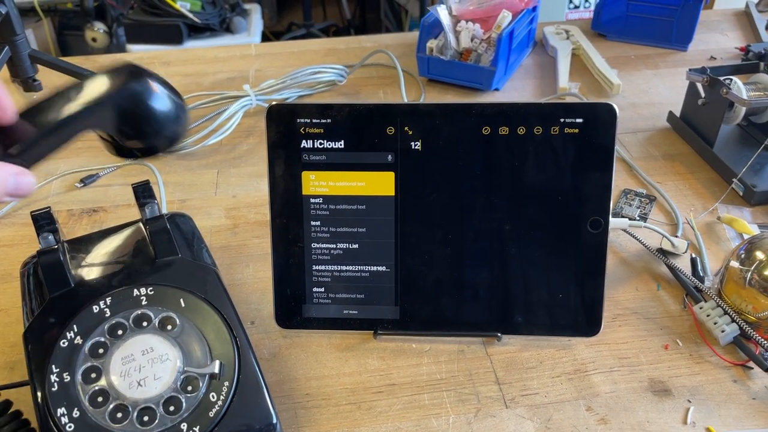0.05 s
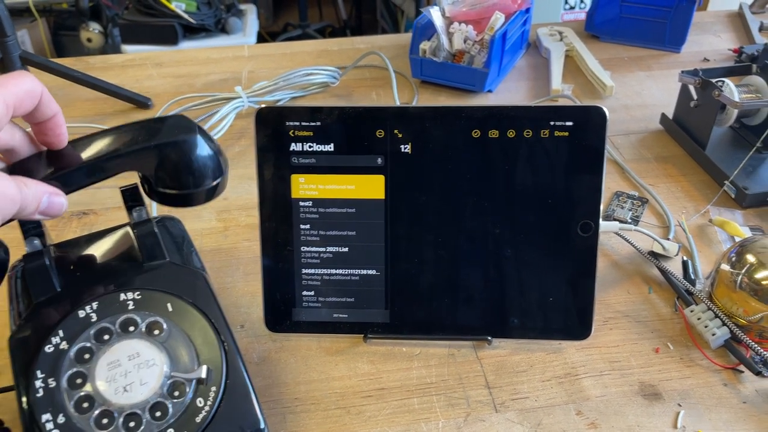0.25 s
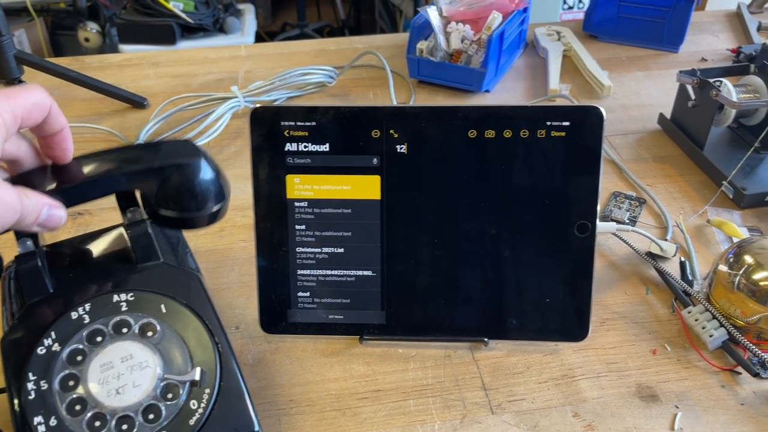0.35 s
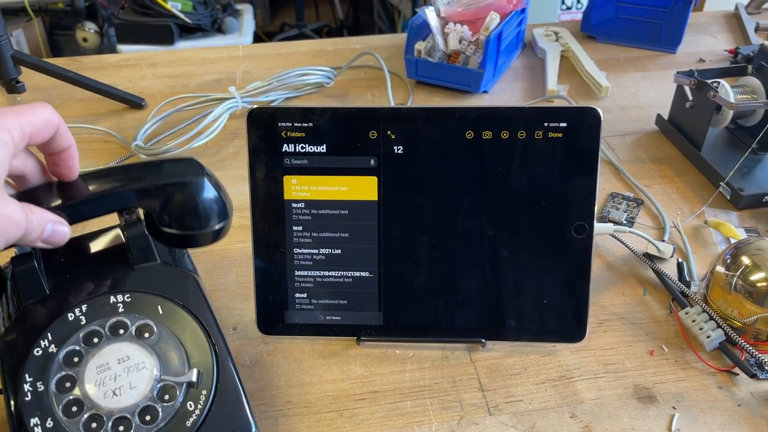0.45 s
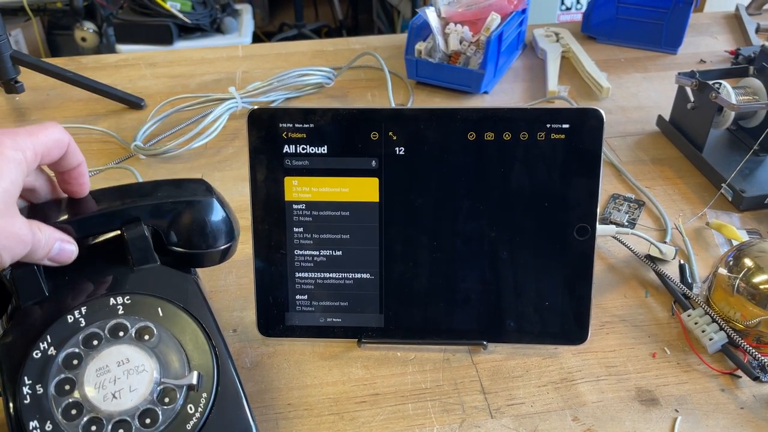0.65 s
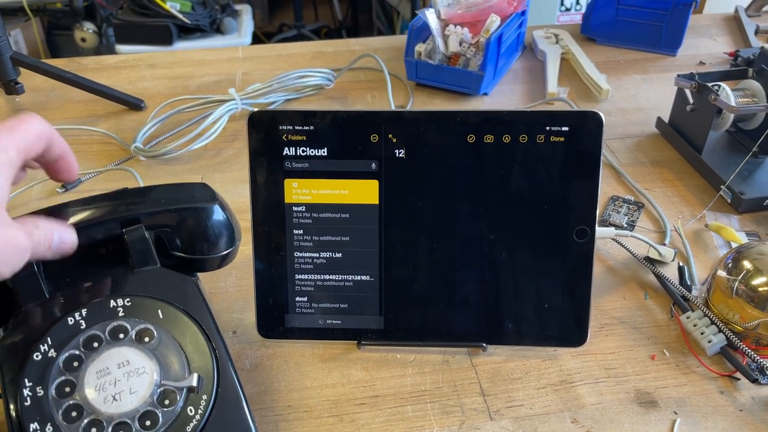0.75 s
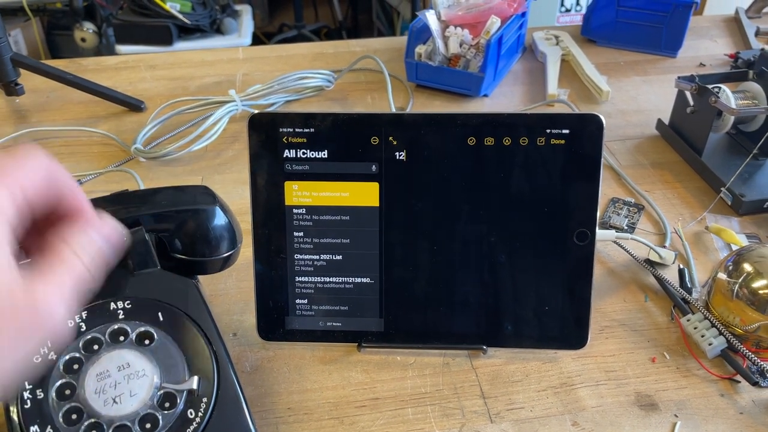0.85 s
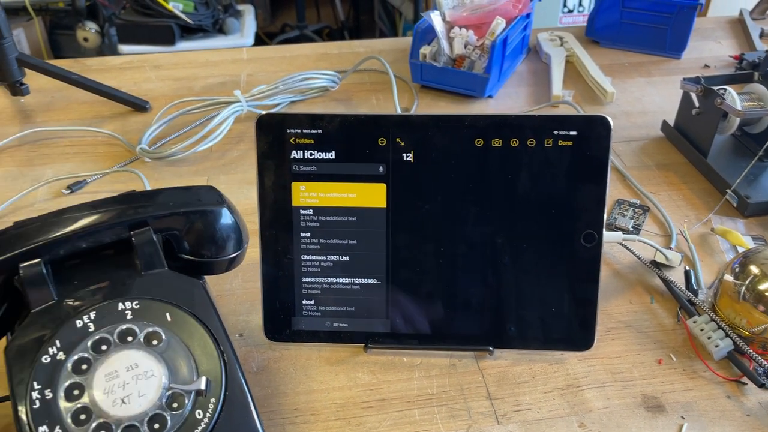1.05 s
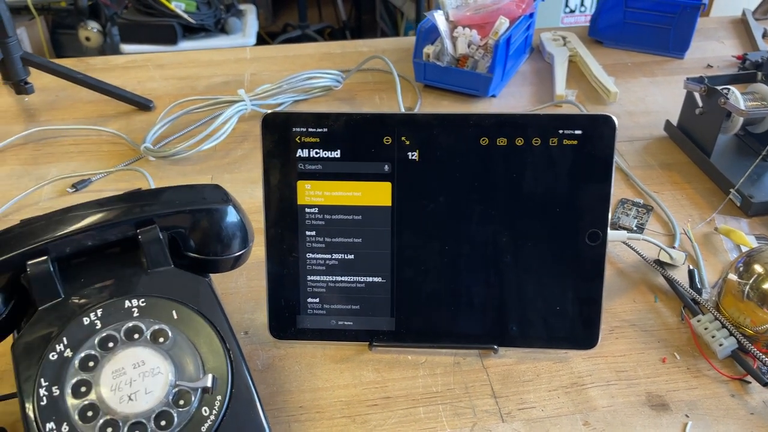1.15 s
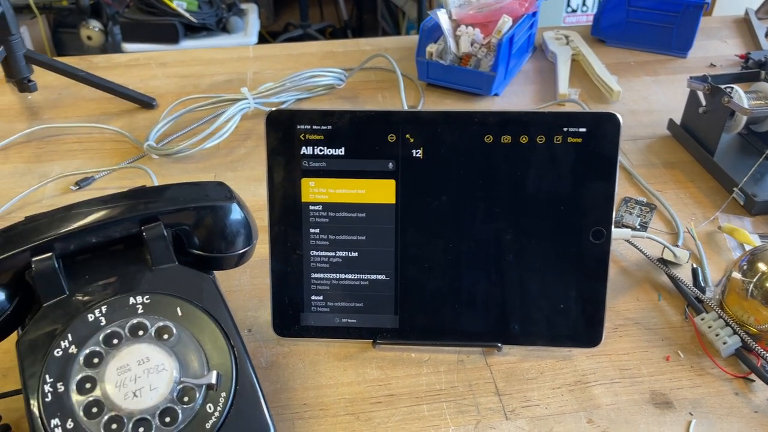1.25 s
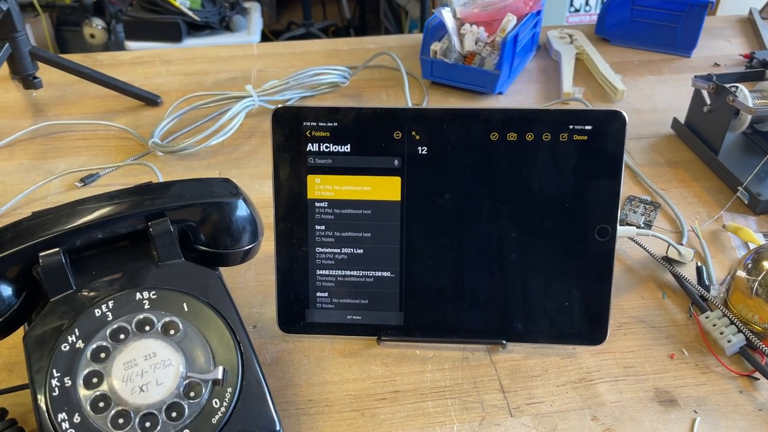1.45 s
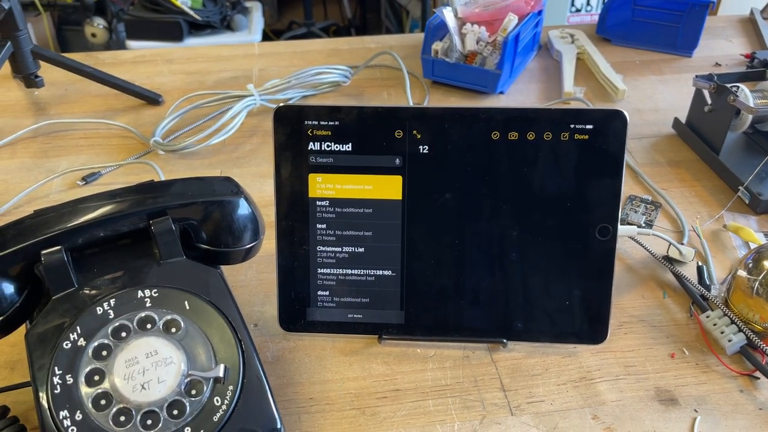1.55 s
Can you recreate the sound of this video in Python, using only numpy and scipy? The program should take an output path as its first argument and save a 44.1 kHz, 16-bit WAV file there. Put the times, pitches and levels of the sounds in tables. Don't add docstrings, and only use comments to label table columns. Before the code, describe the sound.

A heavy plastic telephone handset lands on its cradle, close and slightly left. A sharp hollow clack comes at 0.25 seconds, another at 0.44, a lighter tap near 0.58, then a bright drop at 0.75 with rattling bounces until about 0.9. Skin and cord slide faintly; tiny ticks and creaks settle by 1.2. The bench hums low, the room answers briefly, and soft ventilation rumbles throughout.

```python
import sys
import numpy as np
from scipy import signal
from scipy.fft import rfft, irfft, next_fast_len
from scipy.io import wavfile
from scipy.ndimage import uniform_filter1d

SR = 44100
rng = np.random.default_rng(int(sys.argv[2]) if len(sys.argv) > 2 else 0)


def unload_audio(sound):
    columns = np.transpose(np.atleast_2d(sound))
    steps = np.round(np.clip(columns, -1, 1) * 32767)
    wavfile.write(sys.argv[1], SR, steps.astype(np.int16))


def makeup_ratio(level_db):
    decades = np.asarray(level_db, float) / 20
    return 10 ** decades


N = 70560
AIR_TOP_HZ = 12400

# start_s, chatter_db, base_db, shell_db, cradle_db
KNOCKS = [(0.2439, -18.5, -21, -19, -21), (0.2539, -20.5, -29, -32, -44.5), (0.2604, -61, -35, -48, -44),
          (0.4366, -20, -18, -18, -22), (0.4406, -24.5, -41, -26.5, -40.5),
          (0.4474, -43.5, -35, -40, -37.5), (0.5841, -30, -29, -29, -39.5), (0.618, -51, -42.5, -62, -69),
          (0.6341, -39, -52.5, -45.5, -56), (0.697, -38.5, -40, -41, -35),
          (0.7498, -20.5, -22.5, -24, -33.5), (0.7548, -29.5, -30, -36.5, -39.5),
          (0.8031, -25, -25.5, -23, -33), (0.851, -30, -29.5, -28.5, -31), (0.8709, -41, -37, -46.5, -41.5),
          (0.8982, -49, -53, -48, -47.5), (0.951, -63, -43.5, -45, -40.5), (1.0014, -54, -49, -47, -41.5)]
LANDINGS = [
    .42,
    .57,
]
# delay_s, level_db
FIRST_TOUCHES = [
    (.0005, -23),
    (.0022, 1),
    (.0044, 5),
]
# delay_s, level_db
SECOND_TOUCHES = [
    (.0005, -10),
    (.0019, 0.5),
    (.0042, 4.5),
]
# delay_s, level_db
DROP_TOUCHES = [
    (.0005, -7.5),
    (.0022, 3),
    (.0044, 7.5),
]
# pitch_hz, t60_s, first_fork_db, second_fork_db, drop_db
BASE = [(235.5, .08, -18.5, -4, -5), (350, 0.022, -9.5, -27.5, -18.5), (381, .05, -7.5, -13, -3.5),
        (437, 0.071, 0.5, -6, -6.5)]
# pitch_hz, t60_s, first_fork_db, second_fork_db, drop_db
SHELL = [(780, 0.0067, -9, -12.5, -3), (885, 0.027, -4.5, -6.5, -3.5), (974, .03, 0.5, -3, -5),
         (1064.5, 0.023, -11.5, 7, 5), (1293, 0.0304, -14.5, -19.5, -11)]
# pitch_hz, t60_s, first_fork_db, second_fork_db, drop_db
CRADLE = [(499.7, 0.063, -13.5, -10, -8.5), (583, .03, -5.5, -12.5, -9.5), (597.7, .034, -5, -3.5, -7),
          (646.4, 0.062, 1.5, 3, -1.5)]
# pitch_hz, t60_s, first_fork_db, second_fork_db, drop_db
PARTS = [(1482, 0.029, 0.5, 0, 10), (1700, 0.059, 0, 8.5, 12), (1817, .025, 3.5, 11, -7),
         (2010, .03, 3, -1, -17), (2287, .03, 5, 2.5, 2.5), (2600, .03, 3.5, -6.5, -4.5),
         (2857, .027, -4.5, -3, 8), (3190, .021, -10, -1, 2), (3400, .03, -10.5, -18.5, 1.5),
         (4630, .02, -3.5, -12, -10), (5600, .026, -1, -0.5, -1), (5870, .026, -2, -1.5, -7),
         (7300, .023, -13.5, -18.5, -22.5), (8880, .023, 4.5, -6.5, -10.5)]
# pitch_hz, level_db (per Hz)
CRACK = [(760, -8), (1300, -3), (2740, -7.5), (3760, -15), (4560, -11.5), (5070, -19.5), (8720, -16.5),
         (11400, -20), (16500, -75)]
# start_s, level_db, centre_hz
TICKS = [(0.16, -67.5, 4500), (0.158, -50, 1930), (0.2366, -51.5, 1910), (0.429, -29, 1670),
         (.5891, -35.5, 4780), (0.618, -42.5, 4840), (0.6374, -47.5, 4600), (0.6938, -44.5, 4700),
         (0.898, -55, 4000), (.9186, -63, 3710), (.952, -55, 2750), (0.955, -79, 4080), (1.002, -72, 2933)]
# start_s, length_s, level_db
EDGES = [
    (.2438, .003, -10.5),
    (0.433, .009, -2),
    (0.75, 0.0043, -1.5),
]
# time_s, level_db
SETTLING = [
    (.84, -80),
    (.88, -50),
    (.94, -55),
    (1.03, -53),
    (1.1, -54),
    (1.2, -70),
    (1.25, -85),
]
# time_s, level_db
HANDLING = [(0, -68), (.05, -70), (.08, -85), (.42, -80), (.5, -64), (.6, -57), (.74, -57), (.86, -56),
            (.93, -67), (1.05, -69), (1.13, -75), (1.2, -95)]
# pitch_hz, level_db (per Hz)
SLIDE = [(200, -13.5), (500, -4.5), (1200, 7), (2500, 1), (5000, -11.5), (9000, -14), (13000, -22)]
# pitch_hz, difference_db
LEFT_LOUDER = [(60, 3.5), (130, -0.5), (290, 0.5), (640, 3), (1410, -1), (3100, 3), (6820, 6.5),
               (15000, 0.5)]
# pitch_hz, lead_radians
LEFT_LEADS = [(200, .15), (600, .45), (1290, 1.4), (3010, 6.6), (7580, 7.2), (11600, .3), (12900, -.3),
              (14900, -6.2)]
# pitch_hz, t60_s
ROOM_T60 = [(200, 0.53), (700, 0.33), (2500, 0.38), (6000, 0.35), (12000, 0.33)]
MOVES = [
    .42,
    .57,
    .74,
    .845,
]
# pitch_hz, level_db (per Hz)
RUMBLE = [(30, -4), (62, 0), (125, -5), (250, -12), (500, -23), (1000, -37), (2500, -57), (12000, -66)]
# pitch_hz, likeness (0 to 1)
LIKENESS = [(60, 1), (240, 0.69), (950, 0.13), (3770, 0.81), (15000, 1)]


def rms_one(x):
    return x / np.sqrt(np.mean(x ** 2) + 1e-20)


def at_hz(points, hz):
    p = np.array(points)
    return np.interp(np.log(hz + 1), np.log(p[:, 0] + 1), p[:, 1])


def at_time(points):
    s, db = np.transpose(points)
    return makeup_ratio(np.interp(np.arange(N) / SR, s, db))


def shape(x, response):
    size = next_fast_len(2 * N)
    return irfft(rfft(x, size) * response(np.arange(size // 2 + 1) * SR / size), size)[..., :N]


def butter(x, order, hz, kind="low"):
    return signal.sosfilt(signal.butter(order, hz, kind, fs=SR, output="sos"), x)


def ring(clicks, hz, t60):
    r = makeup_ratio(-60 / (t60 * SR))
    w = 2 * np.pi * hz / SR
    return signal.lfilter([0, np.sin(w)], [1, -2 * r * np.cos(w), r * r], clicks + 1e-18)


def impulses(s, gain):
    lead_s = 0.0005
    out = np.zeros(N)
    np.add.at(out, ((np.ravel(s) - lead_s) * SR).astype(int), np.ravel(gain))
    return out


def body(modes, column, spread_db, longest=1):
    contact_hz, push_db = 1810, -8
    rows = np.array(KNOCKS)
    landing = np.searchsorted(LANDINGS, rows[:, 0])
    touches = np.array([FIRST_TOUCHES, SECOND_TOUCHES, DROP_TOUCHES])[landing]
    touch_s = rows[:, :1] + touches[:, :, 0]
    touch_db = rows[:, column:column + 1] + touches[:, :, 1]
    out = 10 * impulses(touch_s, makeup_ratio(touch_db + push_db))
    for hz, t60, *db in modes:
        luck_db = spread_db * rng.standard_normal(len(rows))
        mode_db = np.array(db)[landing] + luck_db
        strikes = impulses(touch_s, makeup_ratio(touch_db + mode_db[:, None]))
        out = out + ring(strikes, hz, min(t60, longest))
    return butter(out, 2, contact_hz)


def chatter_envelope(follows):
    rise_s, t60_s, bright_at_db = 0.0013, 0.032, -22
    s, db = np.array(KNOCKS)[:, :2].T
    t = np.arange(SR // 4) / SR
    db = db + follows * (db - bright_at_db)
    rattle = (1 - np.exp(-t / rise_s)) * makeup_ratio(-60 * t / t60_s)
    return signal.fftconvolve(impulses(s + 0.0005, makeup_ratio(db)), rattle)[:N]


def chatter():
    clicks_per_s, part_cycles = 4300, 45
    dull_hz = 4500
    full, top = chatter_envelope(follows=0), chatter_envelope(follows=1)
    sizes = makeup_ratio(2.8 * np.minimum(rng.exponential(1, N), 4)) * rng.choice([-1, 1], N)
    clicks = rms_one(sizes * (rng.random(N) < clicks_per_s / SR))
    dealt = rng.integers(0, 3, N)
    landing = np.searchsorted(LANDINGS, np.arange(N) / SR)
    parts = np.zeros(N)
    for k, (hz, t60, *db) in enumerate(PARTS):
        loudness = makeup_ratio(db)[landing] * (top if hz > dull_hz else full)
        parts += ring(loudness * clicks * (dealt == k % 3), hz, min(t60, part_cycles / hz))
    hiss = rms_one(shape(rng.standard_normal(N), lambda hz: makeup_ratio(at_hz(CRACK, hz))))
    low = shape(hiss, lambda hz: 1 / (1 + (hz / dull_hz) ** 4))
    crack = low * full + (hiss - low) * top
    return makeup_ratio(-22) * parts, makeup_ratio(0.5) * crack


def ticks():
    octaves, top_hz, t60_s, rise_s = 0.26, 6780, 0.035, 0.00074
    out, t = np.zeros(N), np.arange(SR // 20) / SR
    for s, db, hz in TICKS:
        fade = makeup_ratio(db - 0.5 - 60 * t / t60_s) * np.clip(t / rise_s, 0, 1)
        burst = rng.standard_normal(len(t)) * fade
        tick = 2 * butter(burst, 3, hz * 2 ** (octaves * np.array([-1, 1])), "band")
        if hz > 4400:
            tick = tick + makeup_ratio(-11) * butter(burst, 2, [top_hz, AIR_TOP_HZ], "band")
        out[int(s * SR):int(s * SR) + len(t)] += tick
    return out


def thump():
    late_s = 0.0051
    rows = np.array(KNOCKS)
    push = impulses(rows[:, 0] + late_s, makeup_ratio(rows[:, 2]))
    hum = ring(push, hz=97.57, t60=0.29) + makeup_ratio(-5.5) * ring(push, hz=170, t60=0.98)
    return butter(hum, 2, [70, 220], "band")


def settling():
    creeps_per_s = 48
    out = np.zeros(N)
    for hz, t60, *_, level_db in BASE[1:] + CRADLE + SHELL[1:]:
        creeps = makeup_ratio(rng.exponential(1, N)) * (rng.random(N) < creeps_per_s / SR)
        out += makeup_ratio(level_db - 3.3 * (hz > 750)) * ring(creeps - creeps.mean(), hz, t60)
    return at_time(SETTLING) * rms_one(out)


def handling():
    slips_per_s = 1300
    sizes = makeup_ratio(2 * np.minimum(rng.exponential(1, (2, N)), 4)) * rng.choice([-1, 1], (2, N))
    slips = sizes * (rng.random((2, N)) < slips_per_s / SR)
    mix = rms_one(slips) + 1.3 * rng.standard_normal((2, N))
    coloured = shape(mix, lambda hz: makeup_ratio(at_hz(SLIDE, hz)))
    return at_time(HANDLING) * rms_one(spread(*coloured))


def edges_only(x):
    edge_hz = 12600
    t = np.arange(N) / SR
    dull = shape(x, lambda hz: 1 / (1 + (hz / edge_hz) ** 60))
    gate = sum(makeup_ratio(db) * (t > s) * (t < s + length) for s, length, db in EDGES)
    return dull + (x - dull) * uniform_filter1d(gate, size=60)


def place_left(phone):
    sign = np.array([[.5], [-.5]])

    def path(hz):
        louder = makeup_ratio(sign * at_hz(LEFT_LOUDER, hz))
        return louder * np.exp(1j * sign * at_hz(LEFT_LEADS, hz))
    return shape(phone, path)


def spread(mid, side):
    alike_below_hz = 2700
    side = shape(side, lambda hz: makeup_ratio(1) * hz / np.hypot(hz, alike_below_hz))
    return np.array([mid + side, mid - side])


def room(x):
    walls_db, near_db, near_t60_s, rise_s = -25, -7.5, 0.099, 0.0009
    t, tail = np.arange(SR * 3 // 4) / SR, 0
    edges = 60 * 2 ** np.arange(0, 8.6, .5)
    white = rng.standard_normal((2, 2, len(t)))
    for k, (low, high) in enumerate(zip(edges, edges[1:])):
        band = butter(white[k % 2], 2, [low, high], "band")
        walls = makeup_ratio(walls_db - 60 * t / at_hz(ROOM_T60, low))
        clutter = makeup_ratio(near_db - 60 * t / near_t60_s)
        tail = tail + band * (walls + clutter)
    tail = tail * np.clip(t / rise_s, 0, 1) / 20
    return signal.fftconvolve(x[None], tail, axes=1)[:, :N]


def rumble():
    mid, side = rng.standard_normal((2, N))
    colour = lambda hz: makeup_ratio(at_hz(RUMBLE, hz))
    alike = lambda hz: np.clip(at_hz(LIKENESS, hz), 0, 1)
    mid = shape(mid, lambda hz: colour(hz) * np.sqrt(1 + alike(hz)))
    side = shape(side, lambda hz: colour(hz) * np.sqrt(1 - alike(hz)))
    return makeup_ratio(-42.5) * rms_one(np.array([mid + side, mid - side]))


def scene():
    base = makeup_ratio(-8) * body(BASE, column=2, spread_db=0.5)
    shell = makeup_ratio(-8.5) * body(SHELL, column=3, spread_db=1, longest=0.038)
    cradle = makeup_ratio(-5) * body(CRADLE, column=4, spread_db=4.5)
    knocks = base + shell + cradle + settling() + ticks()
    parts, crack = chatter()
    direct = knocks + parts + crack
    spreading = knocks + makeup_ratio(-3.5) * parts + makeup_ratio(1) * crack
    direct, spreading = butter([direct, spreading], 2, 130, "high")
    near = place_left(direct + makeup_ratio(-18) * thump())
    place = np.searchsorted(MOVES, np.arange(N) / SR)
    echoes = sum(room(spreading * (place == k)) for k in range(len(MOVES) + 1))
    diffuse = spread(*echoes) + handling() + rumble()
    return edges_only(near) + butter(diffuse, 24, AIR_TOP_HZ)


def top_cut(x):
    return signal.sosfilt(signal.butter(12, 16670, fs=SR, output="sos"), x)


def record(dry):
    def port(hz):
        notch_db = -24 * np.exp(-((hz - 10200) / 330) ** 2)
        dip_db = -16 * np.exp(-((hz - 13700) / 500) ** 2)
        shelf_db = -1.5 / (1 + np.exp((12610 - hz) / 200))
        low_cut_db = -24 / (1 + (hz / 40) ** 4)
        return makeup_ratio(notch_db + dip_db + shelf_db + low_cut_db)
    mix = shape(dry, port)
    return top_cut(mix)


dry = scene()
out = record(dry)
unload_audio(out)
```